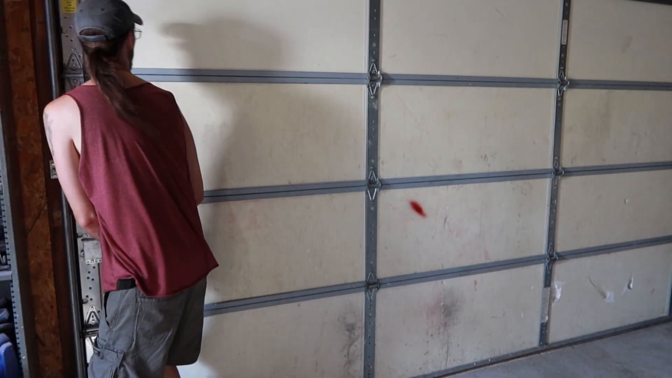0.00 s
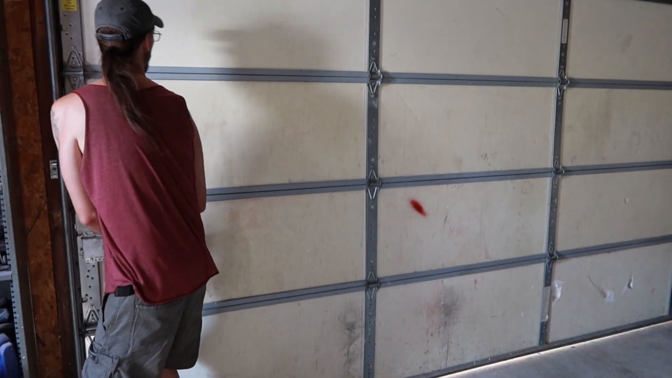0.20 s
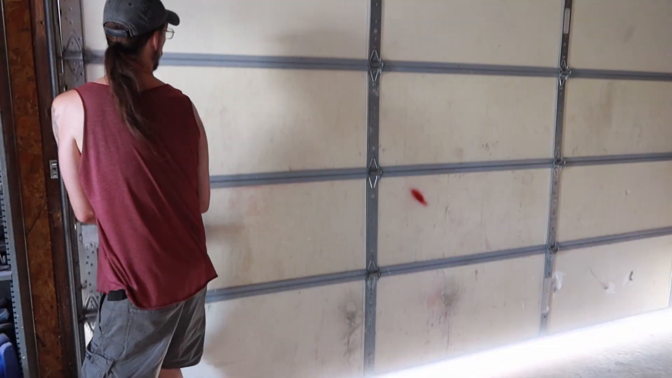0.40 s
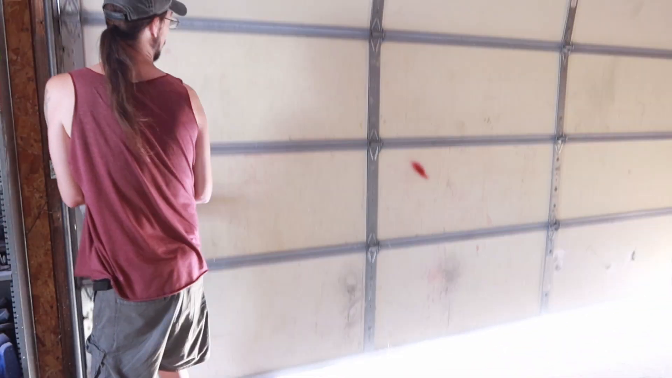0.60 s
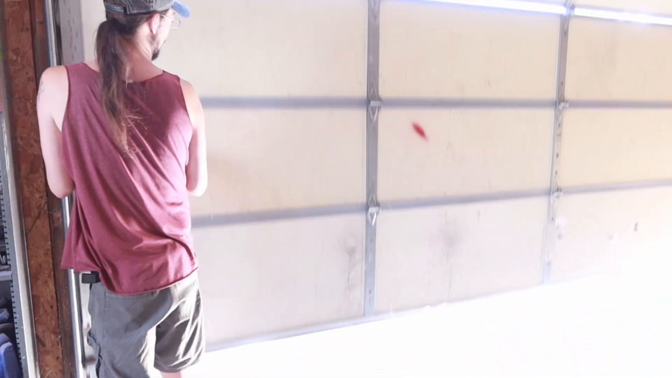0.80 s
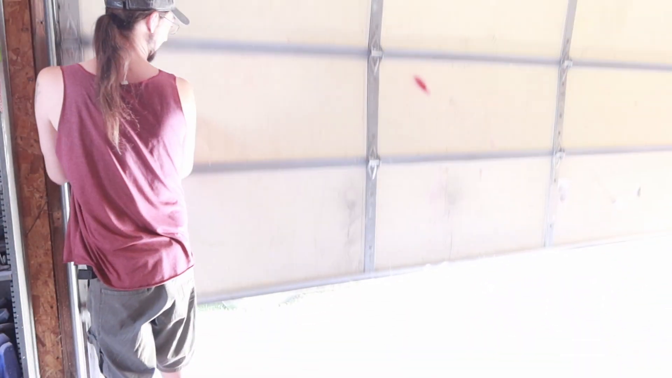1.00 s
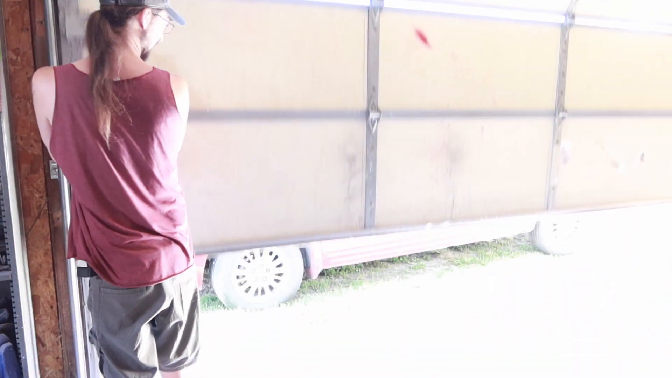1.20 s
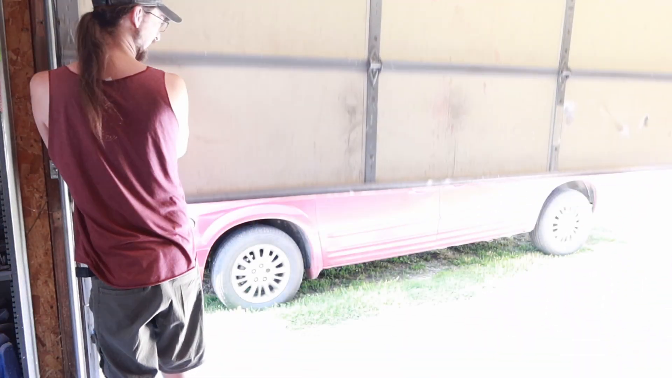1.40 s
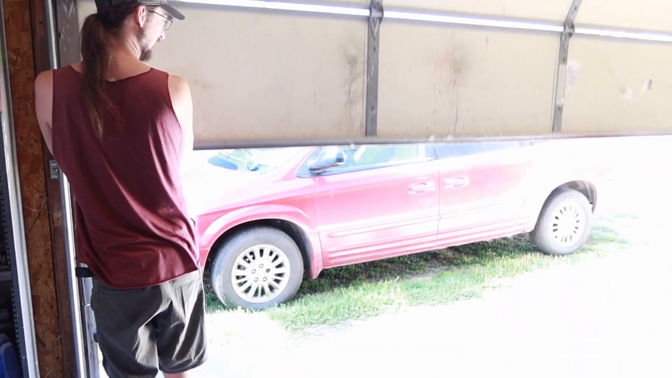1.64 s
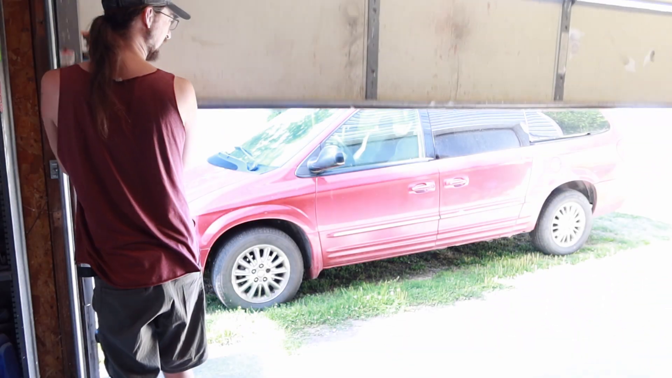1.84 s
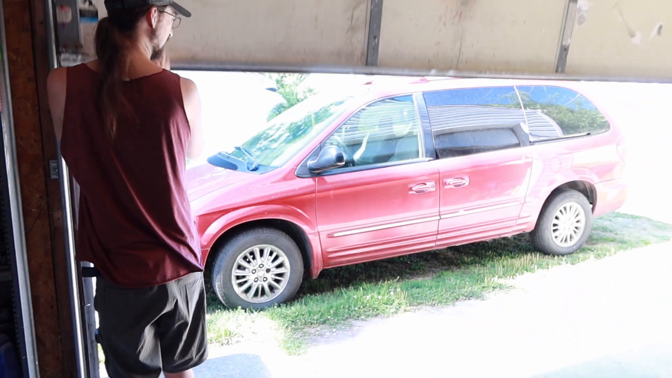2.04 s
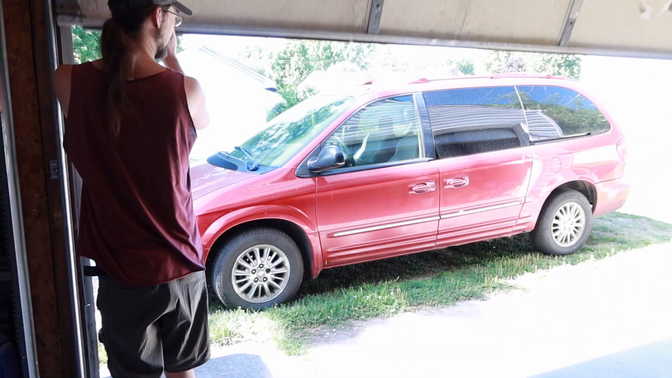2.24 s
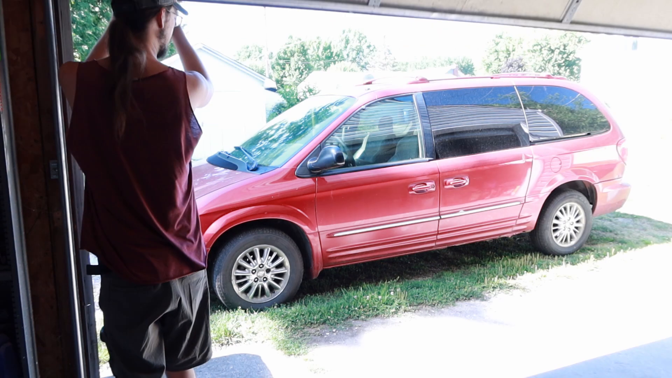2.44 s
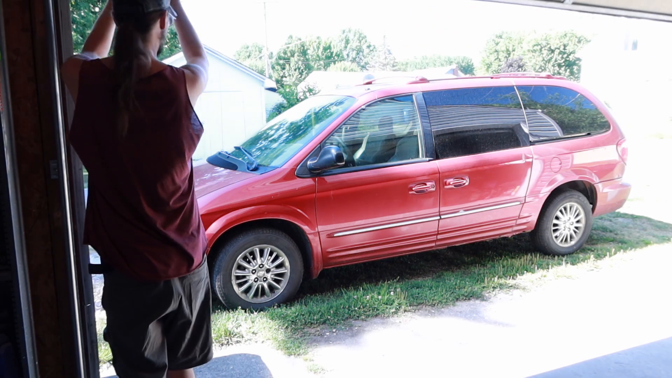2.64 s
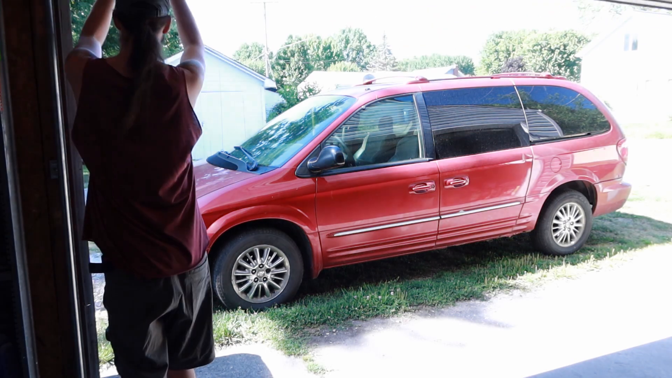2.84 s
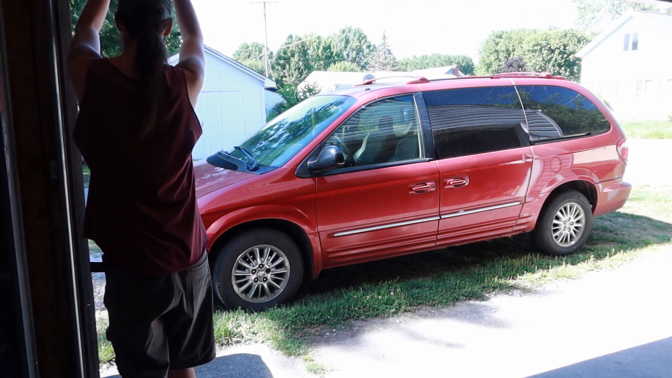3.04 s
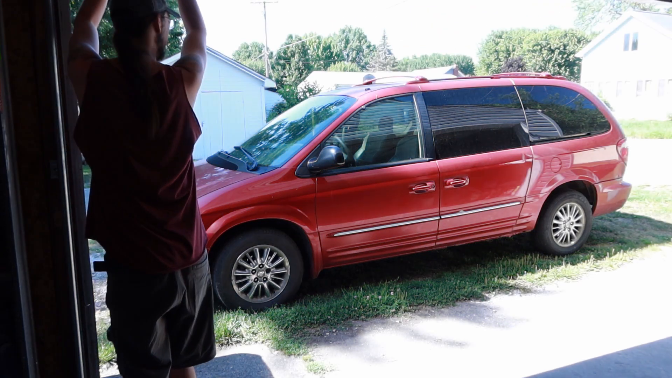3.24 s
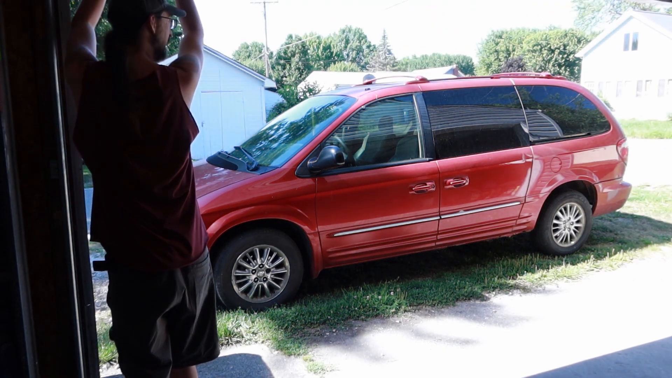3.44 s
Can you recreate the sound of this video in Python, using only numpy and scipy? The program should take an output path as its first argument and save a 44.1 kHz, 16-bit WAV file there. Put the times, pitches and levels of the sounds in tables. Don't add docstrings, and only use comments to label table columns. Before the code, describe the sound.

A sectional steel garage door is lifted by hand. Low rumble and soft knocks until 0.5 s, then rollers chatter loudly and hinges crack sharply, strongest around 0.55, 0.87 and 1.33 s. Panels groan briefly at 0.6-1.4 s; loose brackets tick. Thin squeaks chirp near 1.07, 2.04 and 2.7 s. Clanks and knocks thin out, settling by 3.4 s. Short garage echo, close stereo camera, dullish centre, bright sides.

```python
import sys
import numpy as np
from scipy import signal
from scipy.fft import rfft, irfft, next_fast_len
from scipy.io import wavfile
from scipy.ndimage import uniform_filter1d

SR = 44100
rng = np.random.default_rng(int(sys.argv[2]) if len(sys.argv) > 2 else 0)


def convert_level_to_amplitude(level_db):
    exponent = np.asarray(level_db, float) / 20
    return 10 ** exponent


def to_wav(sig):
    pcm = np.clip(np.atleast_2d(sig), -1, 1) * 32767
    pcm = np.round(pcm).astype(np.int16)
    wavfile.write(sys.argv[1], SR, pcm.T)


N = 154350
T = np.arange(N) / SR
SIZE = next_fast_len(N + SR)
HZ = np.maximum(np.arange(SIZE // 2 + 1) * SR / SIZE, 1)
PLACES = 4

# time_s, level_db, hardware_brightness_db, panel_boom_db
ROLLING = [(0, -37, -10, 5.5), (.1, -46, -6, 2), (.19, -46.5, 5, 9), (.23, -32.5, -27, -16),
           (.37, -40, -8, 5), (.46, -33, -18, 0), (.51, -22.5, -1.5, 2), (.8, -23, 3, 3.5),
           (1.13, -21.5, -0.5, -0.5), (1.3, -25, -1, 3), (1.42, -25, 0.5, 2.5), (1.75, -25, -3, -1.5),
           (1.9, -25.5, 3, 0.5), (2.14, -27, -12.5, -1), (2.66, -28, -6.5, 3), (3.03, -32.5, -13, 4.5),
           (3.41, -36.5, -21, 4), (3.46, -67, 16, 25)]
# start_s, peak_db, pitch_hz, t60_s (time to fade by 60 dB)
PANEL_KNOCKS = [(.051, -31.5, 410, 0.11), (.22, -22.5, 947, 0.065), (0.268, -25, 1570, 0.14),
                (0.288, -30, 76, 0.22), (.517, -23, 189, 0.1), (0.685, -23, 189, 0.13),
                (.78, -18, 262, 0.1), (1.05, -20, 160, 0.13), (1.108, -17, 160, 0.12),
                (1.175, -19, 340, .08), (1.812, -21, 1387, .07), (1.921, -16, 1234, 0.058),
                (2.294, -18, 1247, 0.068), (2.382, -26.5, 200, 0.34), (2.764, -16.5, 1350, 0.045),
                (2.962, -17, 1306, 0.056), (2.39, -24, 1330, .05), (2.484, -20, 1390, .04),
                (2.515, -23, 1350, .05), (2.725, -22, 1310, .04), (3.02, -30, 1290, .05),
                (3.052, -27, 1385, .06), (3.082, -26, 1370, .05), (2.861, -26, 1450, .06),
                (3.33, -34, 1880, 0.067), (3.147, -18, 292, 0.072), (3.169, -25.5, 262, .1),
                (3.195, -24, 243, 0.081), (3.22, -39, 223, 0.11)]
# start_s, peak_db, body_db, length_s
HINGE_CLANKS = [(.108, -23.5, -7.5, 0.028), (.194, -25.5, 4.5, 0.021), (.214, -18, 1.5, 0.025),
                (.4, -29, 8, 0.015), (.434, -24, -4, 0.0079), (.49, -28, 10, 0.033),
                (.501, -13.5, 1, 0.028), (.521, -15.5, 8, 0.0064), (.546, 3, -22, 0.0045),
                (.559, -13, -4, 0.0087), (.745, -17, -20, .03), (.915, -8, -9, 0.013),
                (.846, -6, -8, 0.027), (.872, 8.5, -19, 0.0047), (.951, -5, -22, 0.004),
                (1.075, -1.5, -12, 0.0064), (1.099, -5.5, -12.5, 0.011), (1.118, -13.5, 3.5, .01),
                (1.329, 3, -22, 0.0074), (1.356, -9, -13, .008), (1.379, -5, -6, 0.014),
                (1.423, -4.5, -29, 0.01), (1.556, -11.5, -6, 0.037), (1.62, -16, -3.5, .02),
                (1.789, -12, -3.5, 0.015), (1.808, -12, 1.5, 0.013), (1.835, -12.5, 2, 0.0033),
                (1.868, -9.5, -24, .01), (1.919, -10, -6.5, 0.01), (1.945, -17, -6, 0.011),
                (2.171, -20, 2, .012), (2.2, -18, 0.5, 0.012), (2.258, -25, -3, .005),
                (2.288, -17.5, -18, 0.015), (2.384, -20, 3, 0.0084), (2.482, -19.5, 1, 0.012),
                (2.519, -15.5, -3, 0.005), (2.594, -6, -12, 0.0016), (2.61, -23, 3.5, 0.0063),
                (2.645, -21, 3, .008), (2.87, -22.5, -2, .035), (3.05, -26, -9, 0.0093),
                (3.149, -29, 0, .006), (3.255, -27, -4, 0.0068), (3.119, -26, -20, 0.0049),
                (3.202, -23.5, -3, 0.0092), (3.315, -27, -1, 0.0091)]
# start_s, peak_db
LOOSE_TICKS = [(0.112, -38), (0.4344, -34), (0.488, -23), (0.544, -11.5), (0.6964, -30), (0.8709, -18),
               (0.9484, -25), (1.0994, -34), (1.1757, -27), (1.291, -25), (1.329, -16.5), (1.4286, -22),
               (1.6545, -35), (1.8653, -28), (1.9754, -34), (2.225, -27), (2.2894, -31), (2.3367, -38),
               (2.3816, -31), (2.4154, -36), (2.481, -26), (2.594, -28), (2.7587, -35), (2.793, -34),
               (2.9427, -32.5), (2.9623, -36), (3.048, -35.5), (3.0925, -39), (3.119, -35), (3.2018, -30),
               (3.2546, -37)]
# start_s, length_s, pitch_hz, level_db, sag_hz_per_s
ROLLER_SQUEAKS = [
    (2.035, .075, 4830, -38.5, 400),
    (2.684, .1, 3885, -28.5, 520),
    (2.785, .058, 3760, -40, 1800),
    (2.852, .02, 3710, -44, 600),
    (2.868, .025, 3880, -51, 0),
    (1.072, .045, 5060, -33, 0),
    (.398, .025, 3500, -44, 0),
]
# start_s, length_s, from_hz, to_hz, level_db
PANEL_GROANS = [
    (.64, 0.066, 160, 195, -22),
    (.62, 0.095, 300, 380, -25),
    (.77, 0.0994, 260, 370, -21),
    (0.95, 0.062, 120, 190, -28),
    (1.3, 0.125, 150, 190, -28),
]
# pitch_hz, level_db, ring_s (each tone fades by 60 dB in about 0.38
STEEL_MODES = [(1570, -1, 0.22), (1670, -3, 0.45), (2122, 9, 0.086), (2460, -12, 0.041), (2670, -17, 0.096),
               (3100, 1.5, 0.047), (3960, 4.5, 0.033), (4120, -20, 0.13), (4940, -22, .1),
               (5080, 0.5, 0.12), (5730, 12, 0.077), (6160, 17, 0.19), (6800, 17.5, 0.043)]
# pitch_hz, level_db, ring_s (each tone fades by 60 dB in about 0.38 of this
PANEL_MODES = [(49, 9.5, 0.27), (76, 6, 0.2), (103.4, 18.5, 0.37), (155.4, 6, 0.65), (194, -12, 0.72),
               (251, -3, 0.75), (311, -14, 0.067), (373.4, 12, 0.13), (421, -30, 0.45), (595, -13, 0.15),
               (870, 17, 0.053), (1290, -28, 0.22), (1350, 18, 0.054)]
# frequency_hz, level_db
CENTRE_TONE = [(25, -16), (110, -4), (160, 0.5), (870, -6), (1530, -5), (7000, -14.5), (10700, -23.5),
               (14500, -23)]
# frequency_hz, level_db
SIDE_TONE = [(60, -46), (414, -13.5), (1010, -18.5), (1590, -10.5), (4920, -6), (7350, -6), (10800, -3.5),
             (15000, -9.5)]


def unit(x):
    return x / np.sqrt(np.mean(x ** 2))


def shape(x, gain):
    return irfft(rfft(x, SIZE) * gain, SIZE)[:N]


def colour(points):
    hz, db = np.transpose(points)
    return convert_level_to_amplitude(np.interp(np.log(HZ), np.log(hz), db))


def above(hz):
    return 1 / np.sqrt(1 + (hz / HZ) ** 4)


def fade(t, t60):
    return np.exp(-np.log(1000) * t / t60)


def walk(rate):
    hold = int(SR / rate)
    steps = np.repeat(rng.standard_normal(N // hold + 1), hold)
    return unit(uniform_filter1d(steps, hold)[:N])


def add(out, s, x):
    i = int(s * SR)
    out[i:i + len(x)] += x[:N - i]


def ring(modes):
    t = T[:SR // 3]
    y = np.zeros(len(t))
    for hz, db, t60 in modes:
        level_luck, pitch_luck = rng.standard_normal(2)
        tone = np.sin(2 * np.pi * hz * (1 + 0.013 * pitch_luck) * t)
        y += convert_level_to_amplitude(db + 3 * level_luck) * fade(t, t60 * 0.38) * tone / np.sqrt(t60)
    return y / np.sqrt(np.sum(y ** 2))


def chatter():
    taps_per_s, spread_db, tap_s, hiss = 200, 5, .0012, .27
    chance, luck = rng.random((2, N))
    strength = convert_level_to_amplitude(2 * spread_db * np.minimum(-np.log(luck + 1e-9), 2.2))
    hits = (chance < taps_per_s / SR) * strength
    power = np.maximum(signal.lfilter([1], [1, -np.exp(-1 / (tap_s * SR))], hits), 0)
    return unit(np.sqrt(power / power.mean() + hiss) * rng.standard_normal(N))


def rolling(jolt_db, rattle_db):
    time_s, *columns = np.transpose(ROLLING)
    db, bright_db, boom_db = [np.interp(T, time_s, column) for column in columns]
    taps = chatter() * convert_level_to_amplitude(db + jolt_db)
    steel_ring = convert_level_to_amplitude(-11) * rfft(ring(STEEL_MODES), SIZE)
    panel_ring = convert_level_to_amplitude(-11) * rfft(ring(PANEL_MODES), SIZE) * .3
    body = 1 + steel_ring + panel_ring
    top, high, low = above(7200), above(2500) ** 2, 1 - above(360)
    hardware = shape(taps * convert_level_to_amplitude(bright_db + .5 * rattle_db), body * (high - top))
    middle = shape(taps, body * (1 - high - low))
    tinkle = shape(taps * convert_level_to_amplitude(0.4 * bright_db + rattle_db), top)
    rumble = rng.standard_normal(N) * convert_level_to_amplitude(db + boom_db + jolt_db + 1.46 * walk(14))
    return hardware + middle + tinkle + shape(rumble, body * low)


def knocks():
    out, t = np.zeros(N), T[:SR // 4]
    for s, db, hz, t60 in PANEL_KNOCKS:
        cluster = np.zeros(len(t))
        for ratio, share in ((1, 1), (1.17, 0.43), (.8, 0.26), (.93, .5)):
            cluster += share * np.sin(2 * np.pi * hz * ratio * t)
        soft_start = np.minimum(t / 0.0042, 1)
        add(out, s, convert_level_to_amplitude(db + 2.5) * cluster * fade(t, t60) * soft_start)
    return out


def clanks():
    top, body, t = np.zeros((PLACES, N)), np.zeros((PLACES, N)), T[:SR // 5]
    for k, (s, db, body_db, length) in enumerate(HINGE_CLANKS):
        place = k % PLACES
        rise_s = max(0.12 * length * length / .02, .0003)
        crack = rng.standard_normal(len(t)) * np.exp(-t / length) * np.minimum(t / rise_s, 1)
        bounce_db = 2.77 * np.repeat(rng.standard_normal(len(t) // 60), 60)
        crack *= convert_level_to_amplitude(db + 3.5 + bounce_db)
        rung = signal.fftconvolve(crack[:SR // 100], ring(STEEL_MODES))
        add(top[place], s, crack)
        add(top[place], s, convert_level_to_amplitude(-13) * rung)
        add(body[place], s, convert_level_to_amplitude(body_db) * crack)
    bright = above(2800) * (1 - 1.54 * above(14200))
    dull = 1 - above(3500)
    return [shape(a, bright) + shape(b, dull) for a, b in zip(top, body)]


def ticks():
    out, t = np.zeros(N), T[:SR // 10]
    for s, db in LOOSE_TICKS:
        add(out, s, convert_level_to_amplitude(db + 20) * rng.standard_normal(len(t)) * np.exp(-t / .007))
    return shape(out, above(6400) ** 2)


def squeaks():
    out, wobble = np.zeros(N), walk(120)
    for s, length, hz, db, sag in ROLLER_SQUEAKS:
        t = T[:int(length * SR)]
        w = wobble[int(s * SR):][:len(t)]
        phase = 2 * np.pi * np.cumsum(hz * (1 + .002 * w) - sag * t) / SR
        swell = np.sin(np.pi * (t / length) ** .8) * convert_level_to_amplitude(db + 6 + 1.5 * w)
        add(out, s, swell * (np.sin(phase) + convert_level_to_amplitude(-19) * np.sin(2 * phase)))
    return out


def groans():
    out = np.zeros(N)
    for s, length, from_hz, to_hz, db in PANEL_GROANS:
        t = T[:int(length * SR)]
        rough = walk(60)[:len(t)]
        slide_hz = from_hz + (to_hz - from_hz) * t / length
        phase = 2 * np.pi * np.cumsum(slide_hz * (1 + 0.043 * rough)) / SR
        hum = np.sin(phase) + 0.82 * np.sin(1.32 * phase)
        add(out, s, convert_level_to_amplitude(db + 3.5 * rough) * np.sin(np.pi * t / length) * hum)
    return out


def garage():
    level_db, low_t60_s, high_t60_s, first_echo_s = -2, 0.44, 0.28, .004
    t = T[:SR * 2 // 3]
    noise = rng.standard_normal(len(t)) * (t > first_echo_s)
    high = above(3600)
    low_tail = rfft(noise * fade(t, low_t60_s), SIZE) * (1 - high)
    high_tail = rfft(noise * fade(t, high_t60_s), SIZE) * high
    tail = low_tail + high_tail
    return convert_level_to_amplitude(level_db) * tail / np.sqrt(np.mean(np.abs(tail) ** 2))


def scene():
    side_db, side_lead_rad, side_shared, air_db = -8.5, 1.33, .5, -46.5
    top = 1 / (1 + (HZ / 15350) ** 90)
    edge = convert_level_to_amplitude(-7) + (1 - convert_level_to_amplitude(-7)) / (1 + (HZ / 7660) ** 30)
    mic = colour(CENTRE_TONE) * edge
    mic = mic / np.interp(1500, HZ, mic)
    side_mic = colour(SIDE_TONE) * convert_level_to_amplitude(side_db)

    jolt_db, rattle_db = .7 * walk(45), 1.5 * walk(55)
    places = [(1.362 * rolling(jolt_db, rattle_db) + hits, 1) for hits in clanks()]
    places.append((ticks() + convert_level_to_amplitude(air_db) * rng.standard_normal(N), 1))
    tones = shape(squeaks() + knocks() + groans(), 1 / np.maximum(mic, .1))
    places.append((tones, convert_level_to_amplitude(-7)))

    mid, side = np.zeros(N), np.zeros(N)
    for door, wet in places:
        near = 1 + wet * garage()
        other = garage() + garage()
        shared = side_shared * near * np.exp(1j * side_lead_rad)
        own = np.sqrt(1 - side_shared ** 2) * other
        mid += shape(door, near * mic * top)
        side += shape(door, (shared + own) * side_mic * top)
    return convert_level_to_amplitude(-1.5) * np.array([mid + side, mid - side])


def low_pass(x):
    return signal.sosfilt(signal.butter(12, 16130, fs=SR, output="sos"), x)


def record(dry):
    mix = np.tanh(dry * 0.8) / 0.81
    return low_pass(mix)


dry = scene()
out = record(dry)
to_wav(out)
```